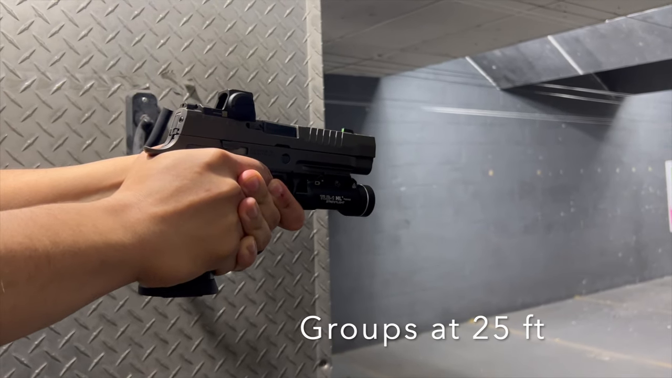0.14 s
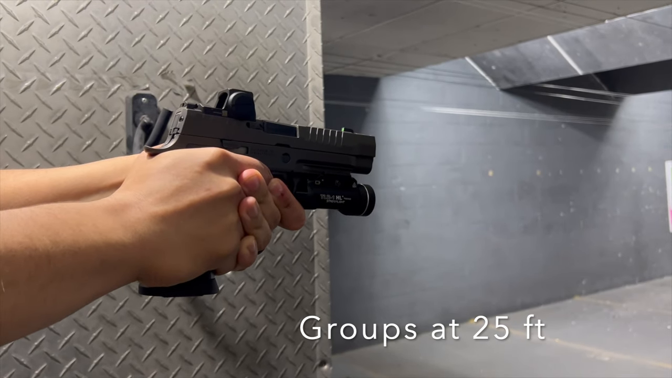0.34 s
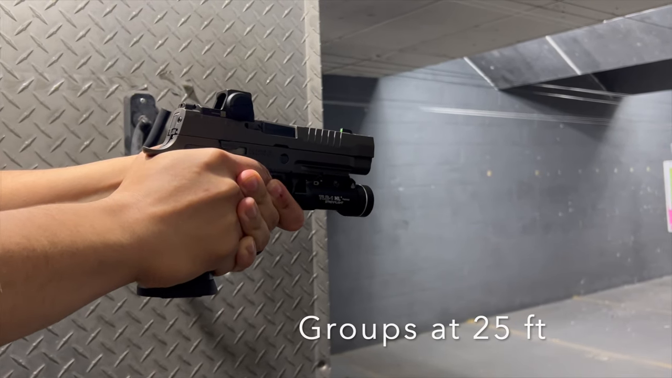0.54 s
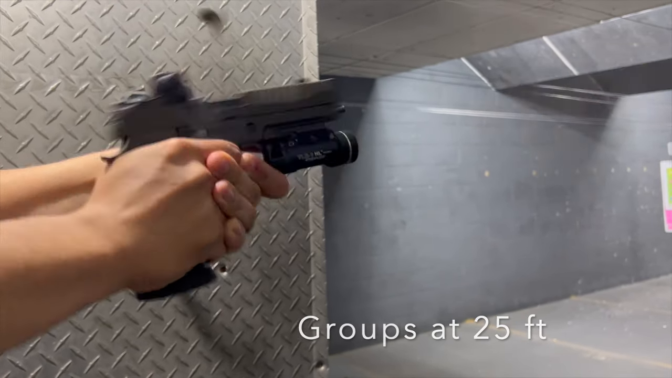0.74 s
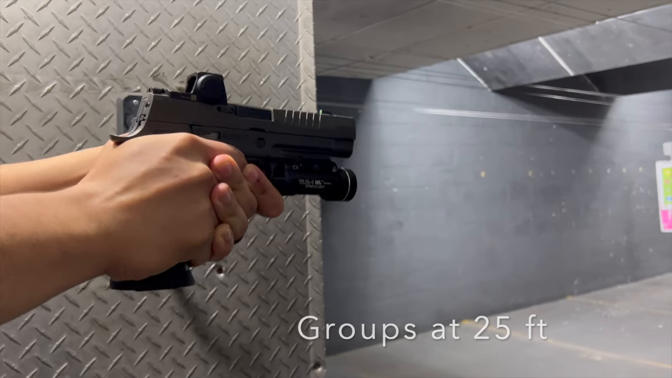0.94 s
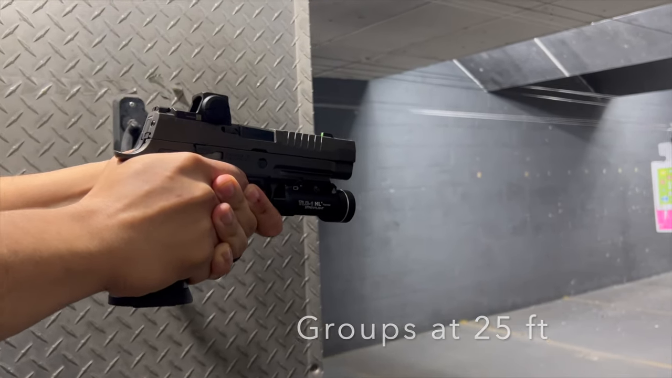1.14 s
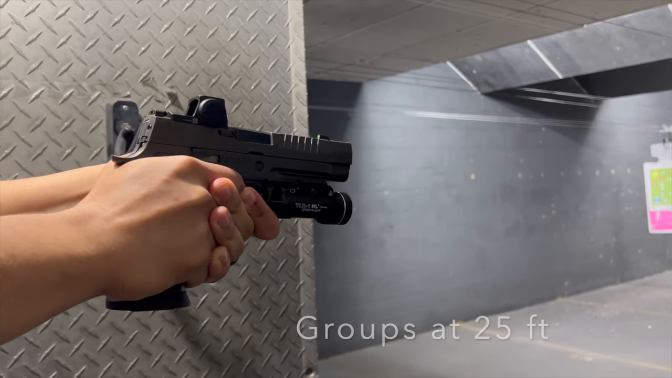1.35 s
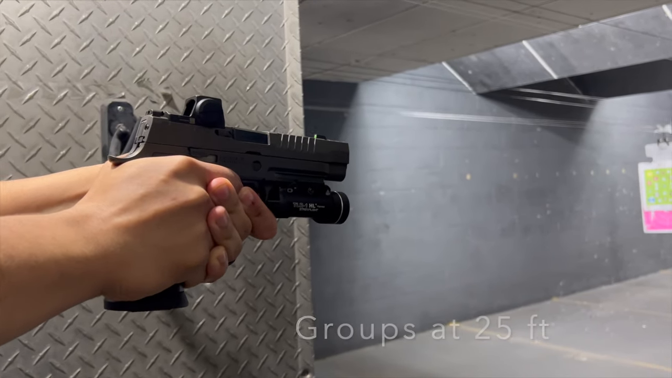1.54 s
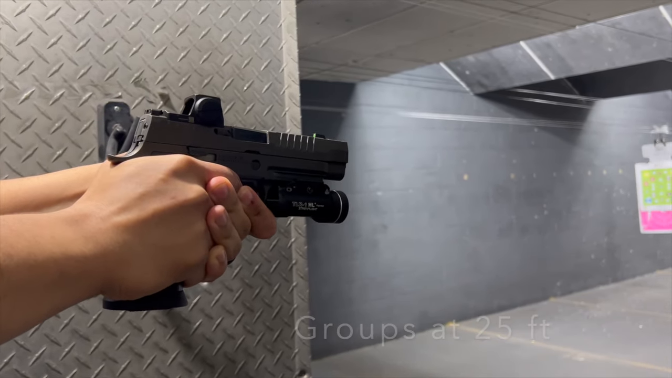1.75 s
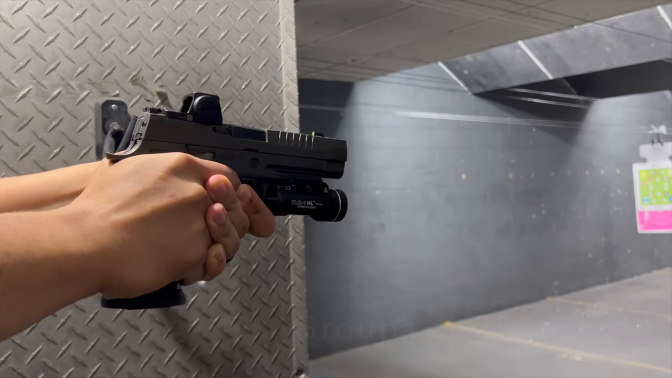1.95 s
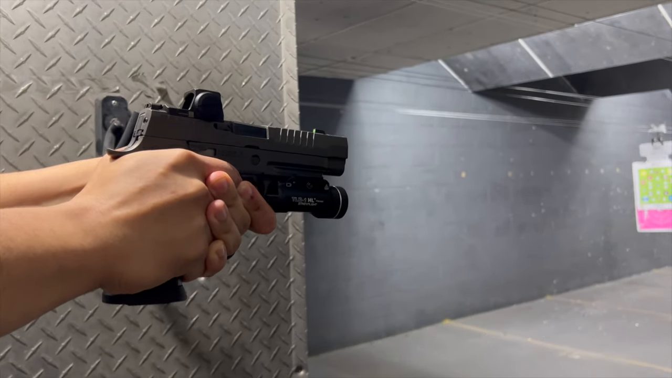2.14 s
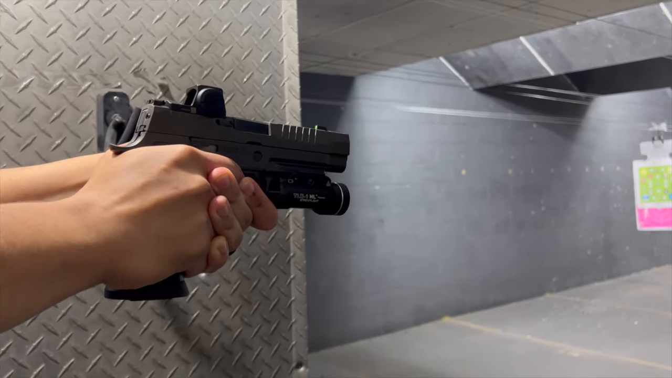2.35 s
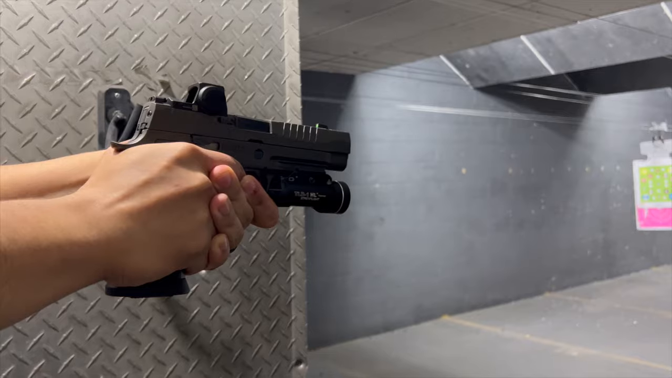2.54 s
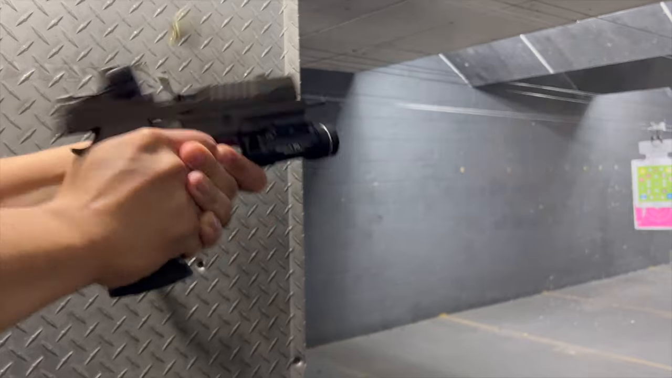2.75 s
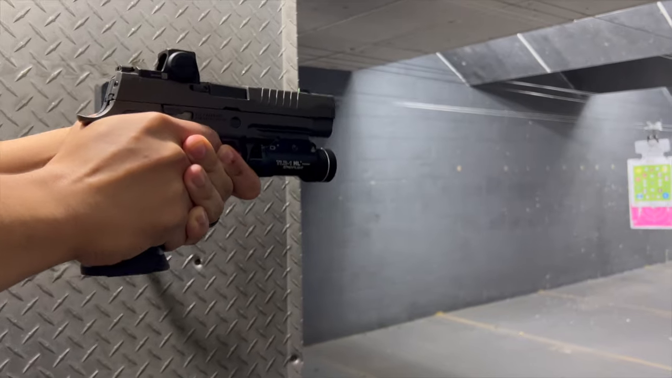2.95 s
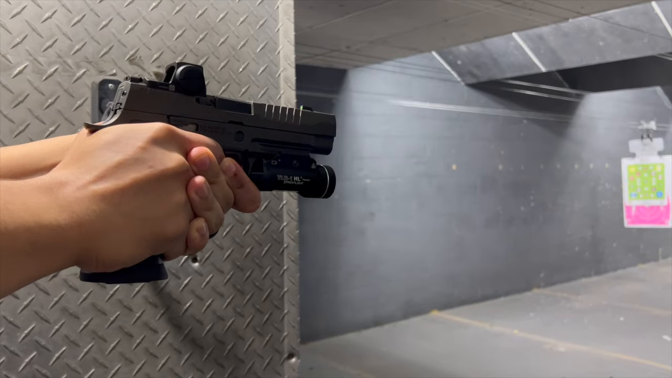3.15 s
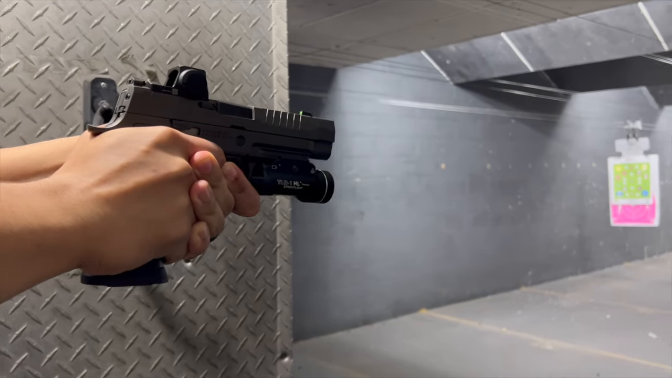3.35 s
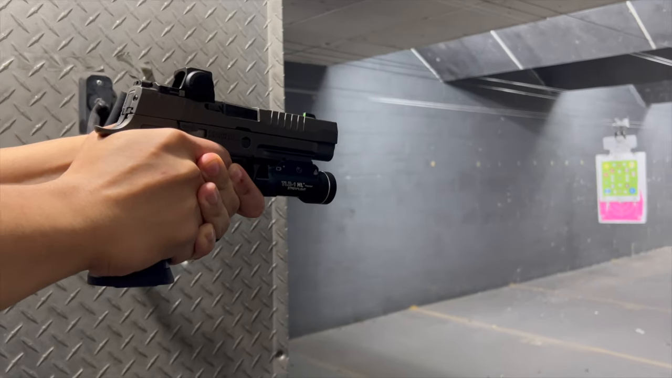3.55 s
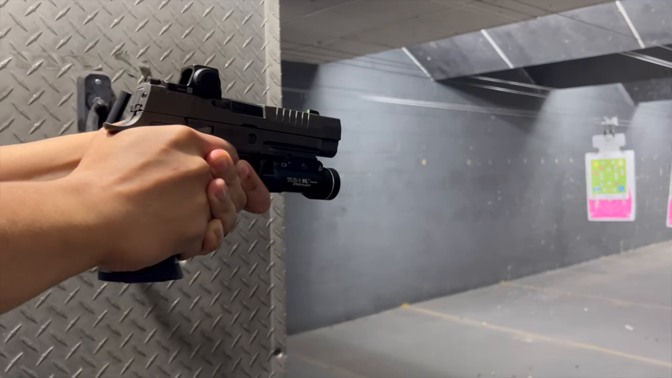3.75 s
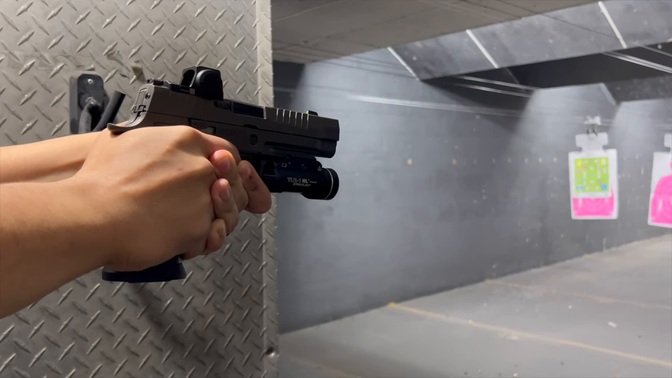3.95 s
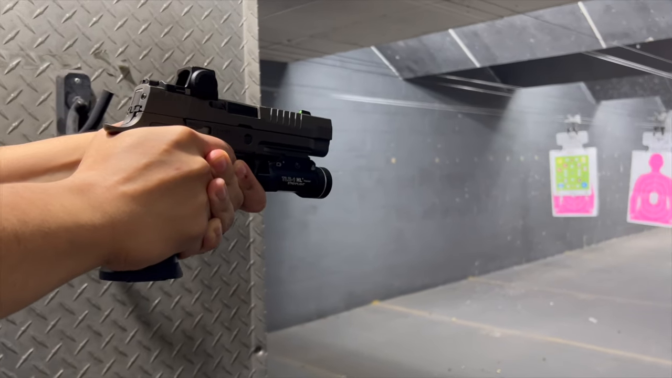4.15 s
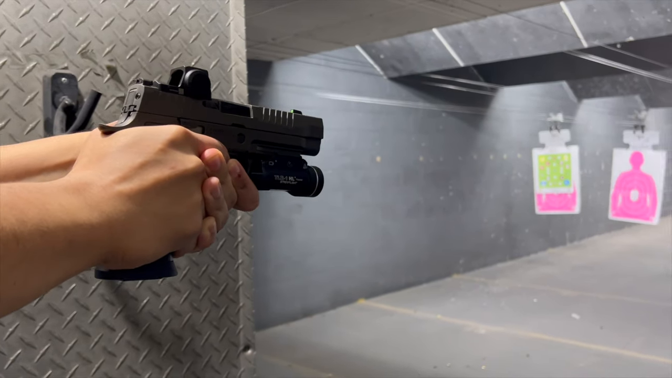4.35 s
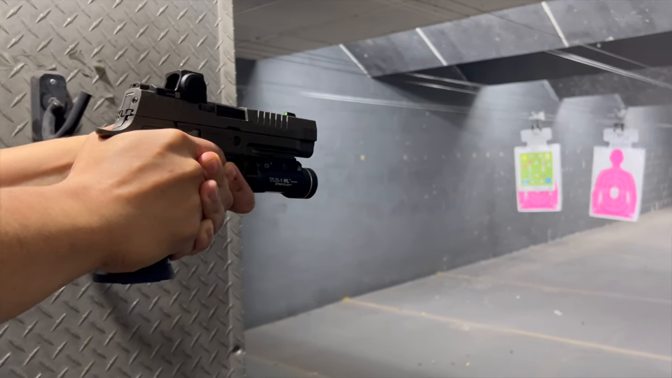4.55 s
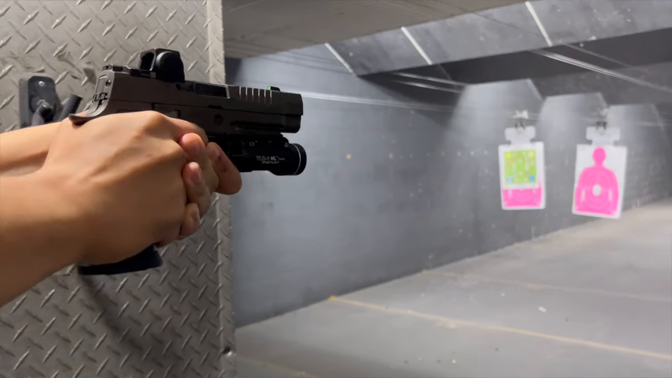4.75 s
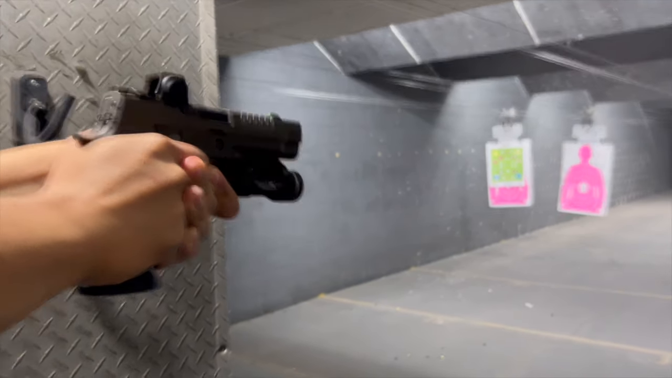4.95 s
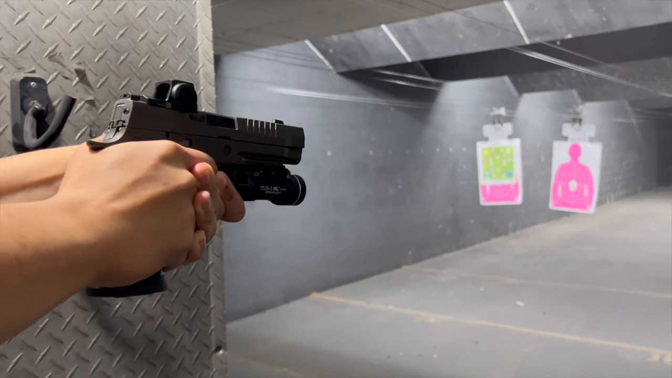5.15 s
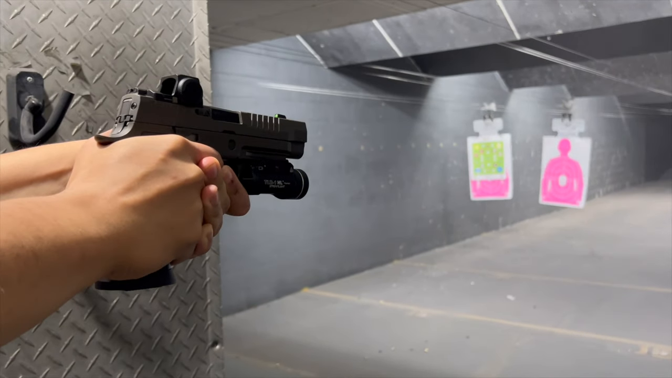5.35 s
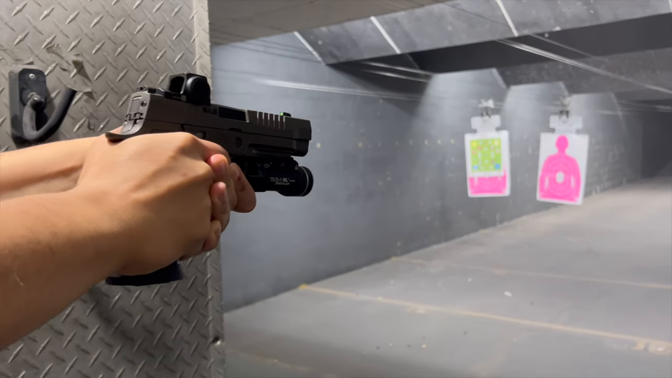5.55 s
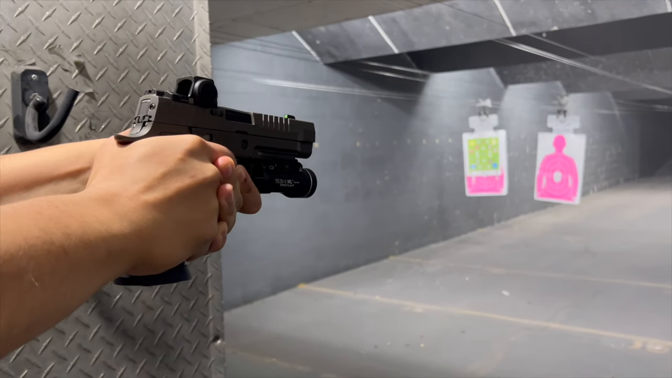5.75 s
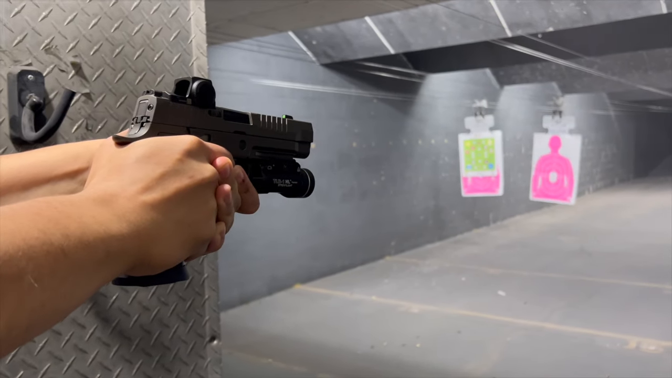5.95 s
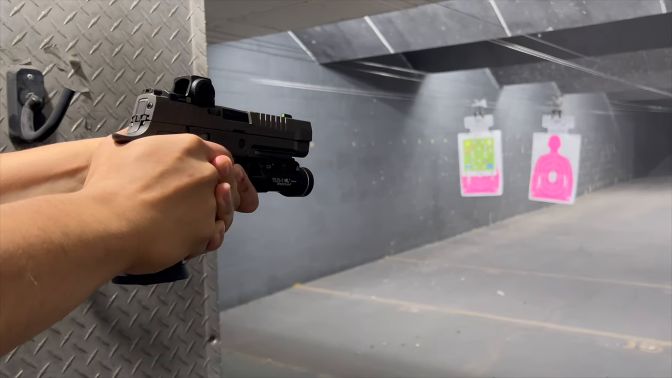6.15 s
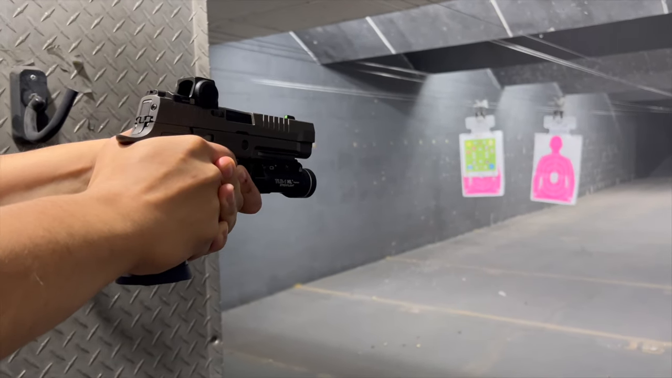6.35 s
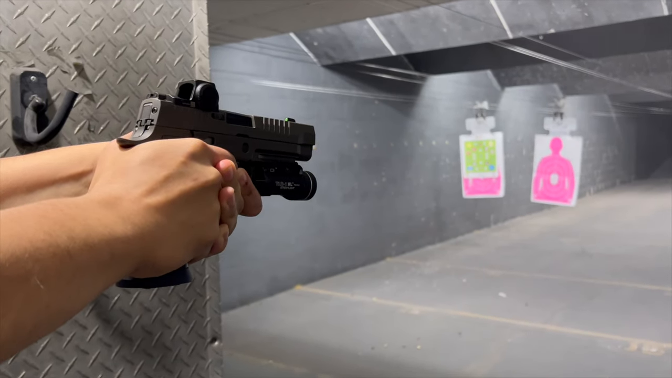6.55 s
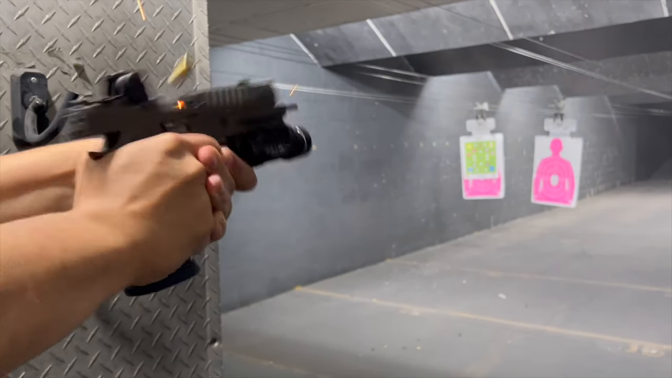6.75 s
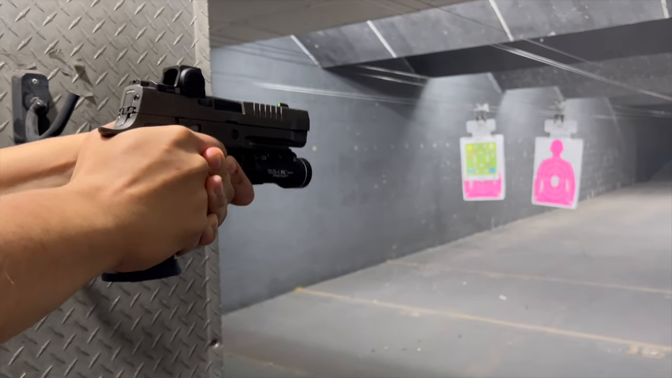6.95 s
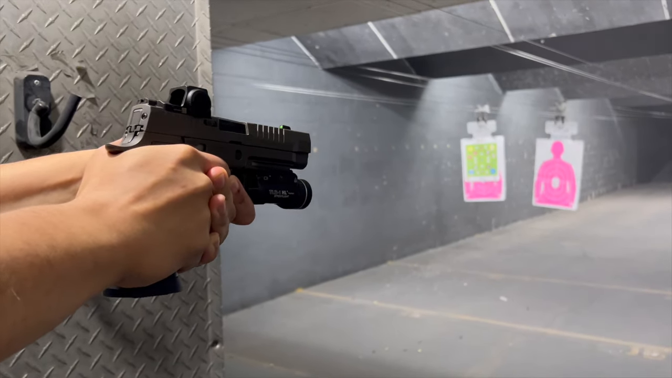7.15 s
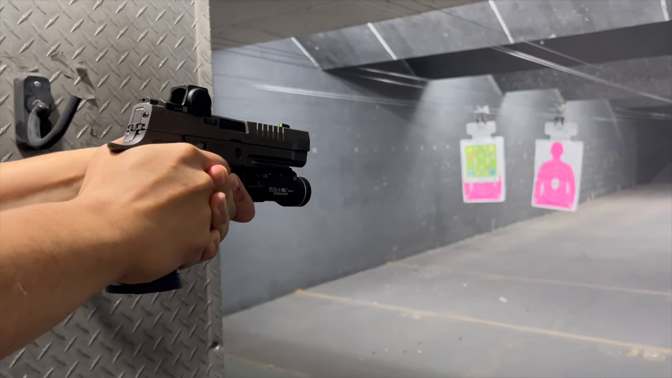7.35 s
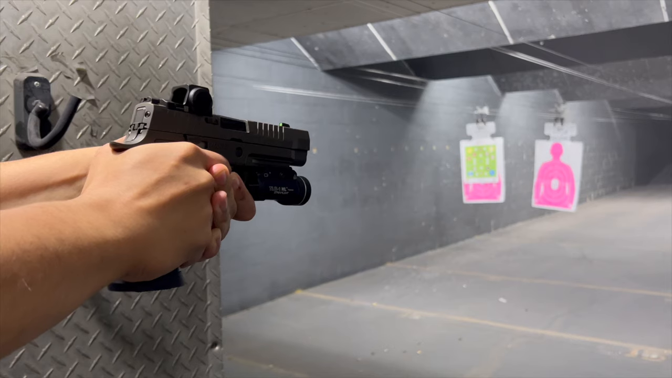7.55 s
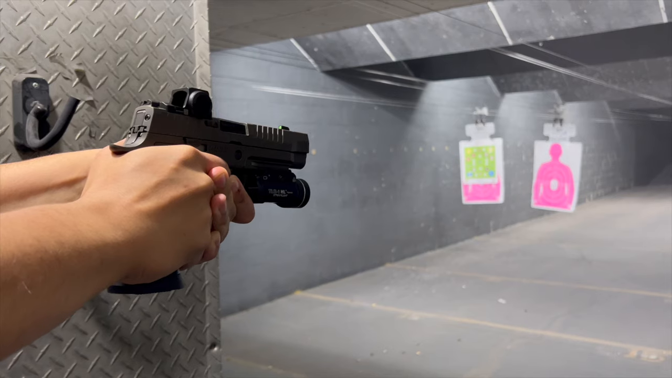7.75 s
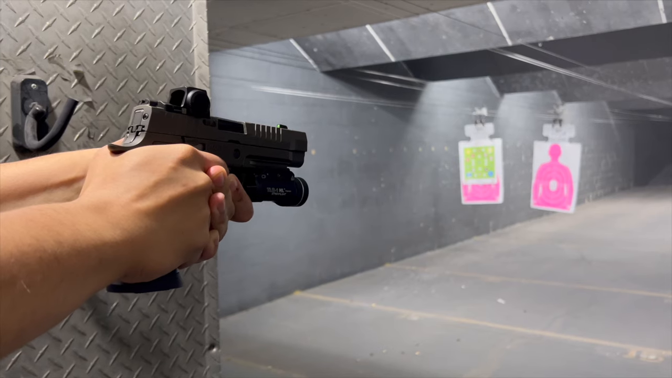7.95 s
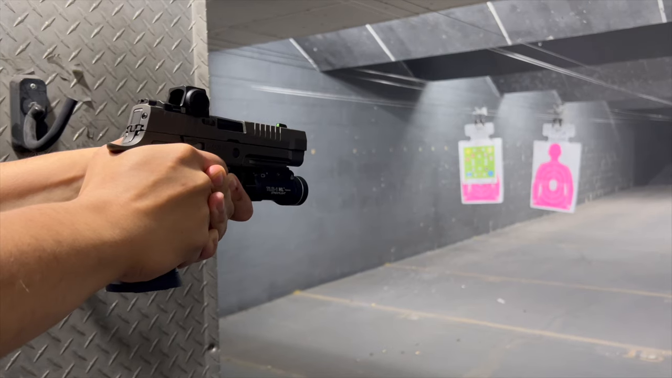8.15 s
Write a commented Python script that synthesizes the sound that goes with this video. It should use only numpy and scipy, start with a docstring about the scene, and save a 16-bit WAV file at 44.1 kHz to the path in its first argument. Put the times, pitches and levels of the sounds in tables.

```python
"""Ventilation noise runs throughout an indoor range; before each shot beside the camera a trigger clicks.
Two pistols fire in neighbouring lanes, the near one first, in a loose, uneven order: shaped noise makes
crack, booth roar and low boom. Echoes return from down the range, then the hall dies in two decays.
Brass cases clack on partitions, bounce and ring on the floor; one knocks the camera with a sagging sine.
The camera thins the deepest bass, limits the peaks and cuts the top."""
import sys
import numpy as np
from scipy import signal
from scipy.fft import rfft, irfft, next_fast_len
from scipy.io import wavfile
from scipy.ndimage import uniform_filter1d, minimum_filter1d

SR = 44100
rng = np.random.default_rng(int(sys.argv[2]) if len(sys.argv) > 2 else 0)


def transcribe(u):
    """Save the signal u as a 16-bit wav file named by the first command-line argument.

    u: samples, shape (n,) or (channels, n), limited to [-1, 1]; the rate is SR.
    q: integer samples, one column per channel.
    """
    v = np.clip(np.atleast_2d(u).T, -1, 1)
    q = np.round(v * 32767).astype(np.int16)
    wavfile.write(sys.argv[1], SR, q)


N = 365588
TIME = np.arange(2 * SR) / SR  # life of one shot [s]


def amp(db):
    """Decibels to gain."""
    return 10 ** (np.asarray(db) / 20)


def unit(x):
    """Scale x to rms 1."""
    return x / np.sqrt(np.mean(x ** 2) + 1e-20)


def along(points, hz):
    """Interpolate (frequency [Hz], value) points on a log frequency axis."""
    point_hz, values = np.transpose(points)
    return np.interp(np.log(hz + 1), np.log(point_hz + 1), values)


def add(track, start_s, sound):
    """Mix a sound into the track, cut at the track's end."""
    part = track[:, round(start_s * SR):][:, :sound.shape[-1]]
    part += sound[..., :part.shape[1]]


def swell(start_s, rise_s):
    """Exponential step from 0 to 1."""
    return 1 - np.exp(-np.maximum(TIME - start_s, 0) / rise_s)


def panned(pan_db):
    """Left and right gains for a level difference."""
    return amp([[pan_db / 2], [-pan_db / 2]])


# Likeness of the spaced microphones: (frequency [Hz], left-right correlation [-1..1])
ALIKE = [(100, .93), (230, .87), (380, .45), (570, .35), (850, .55), (1250, .38), (2000, .18), (4000, .08),
         (9800, .03), (11300, .8)]
# Stereo balance: (frequency [Hz], left minus right [dB])
BALANCE = [(60, 0), (380, -0.1), (600, 2.5), (850, 5), (2000, 8), (3500, 4), (6500, 5.5), (8500, -2),
           (13000, 0.5)]
# Stereo phase: (frequency [Hz], left lead [rad])
LEAD = [(100, .4), (380, .35), (570, 2), (850, 3.2), (1250, 4.1), (2000, 4.7), (4000, 6.3)]


def diffuse(white, spectrum, modes=()):
    """Sound field at two spaced microphones: white noise pairs coloured, correlated and set to rms 1."""
    size = white.shape[-1]
    hz = np.fft.rfftfreq(size, 1 / SR)
    db = along(spectrum, hz)
    for centre_hz, width_hz, lift_db in modes:
        db = db + lift_db / (1 + (2 * (hz - centre_hz) / width_hz) ** 2)
    coloured = rfft(white) * amp(db) * (hz > 18)
    # mixing angle that gives the wanted correlation
    angle = np.arccos(np.clip(along(ALIKE, hz), -1, 1)) / 2
    mid = coloured[..., 0, :] * np.cos(angle)
    side = coloured[..., 1, :] * np.sin(angle)
    tilt = amp(along(BALANCE, hz) / 2) * np.exp(.5j * along(LEAD, hz))
    pair = np.stack([(mid + side) * tilt, (mid - side) / tilt], axis=-2)
    return unit(irfft(pair, size))


# Ventilation spectrum: (frequency [Hz], relative density [dB])
VENT = [(25, -14.5), (50, -8.5), (95, -17), (125, -4.5), (165, -8), (230, -17.5), (500, -20.5),
        (900, -18.5), (1300, -19), (2000, -29), (3300, -37), (7000, -46.5), (15000, -54)]


def ventilation():
    """Steady airflow: faint coloured noise, strongest in the bass."""
    white = rng.standard_normal((2, next_fast_len(N)))
    return amp(-70) * diffuse(white, VENT)[:, :N]


def tick(spectrum, t60_s, room_db, modes=()):
    """Small hard contact: noise with a fast decay and a faint slower answer from the booth."""
    t = TIME[:SR // 2]
    noise = diffuse(rng.standard_normal((2, len(t))), spectrum, modes)
    contact = amp(-60 * t / t60_s)
    room = amp(room_db - 60 * t / 0.33)
    return noise * (contact + room)


# Trigger clicks: (time [s], level [dB])
TRIGGER = [(0.495, -57), (2.498, -55.5), (4.441, -57), (6.542, -54)]
# Click spectrum: (frequency [Hz], relative density [dB])
CLICK = [(300, -0.5), (1500, -9), (4000, -7), (7000, -0.5), (12000, -13), (15500, -12)]


def triggers():
    """Trigger taken up shortly before each near shot: a short noise click."""
    out = np.zeros((2, N))
    for s, db in TRIGGER:
        add(out, s, amp(db) * tick(CLICK, t60_s=0.03, room_db=-22))
    return out


# Contact of a brass case: (frequency [Hz], relative density [dB])
TICK = [(300, -20), (2000, -9.5), (5000, 2), (9000, -1.5), (12000, -12.5), (15500, -17)]
# Resonances of a struck case: (frequency [Hz], width [Hz], lift [dB])
BRASS = [(8670, 540, 1), (9540, 400, 2.5), (12900, 600, 3)]
# Cases landing on concrete: (time [s], level [dB], left minus right [dB], first flight [s])
LANDINGS = [(1.665, -61, 1, 0.079), (4.087, -59, 1, 0.026), (8.265, -72, 0, .08)]
BOUNCE_SHRINK, BOUNCE_LOSS_DB = 0.87, 3  # flight ratio; loss per bounce
CASE_RING_HZ, CASE_RING_DB, CASE_RING_T60_S = 10220, -12, 0.31  # ring level re the landing


def cases_on_floor(contacts=3):
    """Case bounces ever softer and sooner; after the first contact its mouth also rings as a sine."""
    out, t = np.zeros((2, N)), TIME[:SR // 2]
    ring_gain = amp(CASE_RING_DB - 60 * t / CASE_RING_T60_S)
    ring = ring_gain * np.sin(2 * np.pi * CASE_RING_HZ * t)
    for s, db, pan_db, flight_s in LANDINGS:
        for k in range(contacts):
            clink = tick(TICK, t60_s=0.061, room_db=-9.5, modes=BRASS)
            if k > 0:
                clink = clink + ring
            # sum of the k shrinking flights so far
            delay_s = flight_s * (1 - BOUNCE_SHRINK ** k) / (1 - BOUNCE_SHRINK)
            add(out, s + delay_s, amp(db - BOUNCE_LOSS_DB * k) * panned(pan_db) * clink)
    return out


# Cases striking the booth or the camera:
# (time [s], level [dB], left minus right [dB], second touch re first [dB])
CASE_STRIKES = [(1.001, -35, -10, -22), (1.061, -50, -2, -12), (1.273, -53.5, 6, 5), (3.052, -47, -4, -5),
                (4.958, -33.5, 0, -20), (5.194, -55, 0, 2), (7.204, -43, -4, -7)]
TUMBLE_S = 0.01  # from one end touching to the other


def case_strikes():
    """Ejected case strikes a partition, or once the camera, with a short bright clack; two touches."""
    out = np.zeros((2, N))
    for s, db, pan_db, second_db in CASE_STRIKES:
        for delay_s, touch_db in ((0, 0), (TUMBLE_S, second_db)):
            clack = tick(TICK, t60_s=0.044, room_db=-18, modes=BRASS)
            add(out, s + delay_s, amp(db + touch_db) * panned(pan_db) * clack)
    return out


# Rumble of the knocked camera: (frequency [Hz], relative density [dB])
RUMBLE = [(25, -8), (60, 2), (110, -10), (220, -8), (600, -45), (3000, -90)]


def camera_knock(s, db, high_hz, low_hz, sag_s, life_s, rumble_db, rumble_s):
    """Case knocks the camera: a decaying sine sags in pitch over a short noise rumble."""
    hz = low_hz + (high_hz - low_hz) * np.exp(-TIME / sag_s)
    thud = np.sin(2 * np.pi * np.cumsum(hz) / SR) * np.exp(-TIME / life_s)
    rumble = diffuse(rng.standard_normal((2, len(TIME))), RUMBLE) * np.exp(-(TIME / rumble_s) ** 2)
    out = np.zeros((2, N))
    add(out, s, (amp(db) * thud + amp(rumble_db) * rumble) * swell(0, 0.0028))
    return out


PATH_TURN_RAD = 1.05  # turn of the reflection pattern over the whole camera move


def paths(spots, same):
    """Dense reflections as noise: power share `same` is common to all shots and turns with the camera."""
    turn = PATH_TURN_RAD * spots[:, None, None]
    white = rng.standard_normal((len(spots) + 2, 2, len(TIME)))
    common = np.cos(turn) * white[0] + np.sin(turn) * white[1]
    return np.sqrt(same) * common + np.sqrt(1 - same) * white[2:]


# Slow decay strength: (frequency [Hz], level at MIDLIFE_S re fast decay [dB])
LINGER = [(50, -19.5), (200, -25), (400, -14.5), (1100, -9.5), (2600, -10), (3500, -14), (6000, -8.5),
          (12000, -16.5)]
# Fast decay of the hall: (frequency [Hz], t60 [s])
HALL_DECAY = [(50, 0.83), (100, 1.45), (300, 0.95), (700, 1.63), (1300, 1.29), (2500, 1.41), (5000, 0.94),
              (8000, 0.57), (14000, .45)]
MIDLIFE_S = .3  # time at which the fast decay passes 0 dB


def dying(x, late_stretch):
    """Each frequency dies at its own speed; the long lanes hold the mids in a slower second decay."""
    hz, t, z = signal.stft(x, SR, nperseg=256)
    fast_db = -60 * (t - MIDLIFE_S) / along(HALL_DECAY, hz)[:, None]
    slow_db = along(LINGER, hz)[:, None] + fast_db / late_stretch
    gain = np.hypot(amp(fast_db), amp(slow_db))
    return signal.istft(z * gain, SR, nperseg=256)[1][..., :x.shape[-1]]


# Lingering hall modes: (frequency [Hz], width [Hz], lift [dB])
HALL_MODES = [(92.4, 4.8, 11), (210.7, 60, 6.5), (387.6, 12, 7), (711, 33, 5.5), (920, 18, 1.5),
              (1113, 60, -4), (1315, 70, 1.5), (1790, 39, 3.5), (2580, 250, 1), (3400, 300, 0.5)]
RETURN_S, RETURN_RISE_S = .138, .008  # round trip to the far end; rise of the return
HALL_FILL_S = 0.029  # rise of the early hall sound


def hall_tails(spots, spectrum, early_db):
    """Reverberation builds at a reduced level, then fills once the blast returns from the far end."""
    returned = swell(RETURN_S, RETURN_RISE_S)
    filling = amp(early_db) * swell(0, HALL_FILL_S) * (1 - returned) + returned
    field = diffuse(paths(spots, same=0.72), spectrum, HALL_MODES)
    return dying(field, late_stretch=1.93) * filling


# Echo spectrum: (frequency [Hz], relative density [dB])
ECHO = [(40, -17.5), (120, 5.5), (300, -6), (700, 9), (1300, -0.5), (2200, 1), (3500, -18.5), (7000, -17),
        (14500, -49)]
ECHO_RISE_S = 0.0022


def range_echoes(spots, echoes):
    """Distinct returns from down the range: noise bursts with a quick rise and exponential fall."""
    surges = 0
    for delay_s, db, life_s in echoes:
        fall = np.exp(-np.maximum(TIME - delay_s, 0) / life_s)
        surges = surges + amp(db) * swell(delay_s, ECHO_RISE_S) * fall
    return diffuse(paths(spots, same=.65), ECHO) * surges


CLUMP_DB, CLUMP_FADE_S = 1.4, .25  # initial rms unevenness; time constant of evening out


def reflection_clumps():
    """Early reflections arrive in clumps, alike for every shot from one lane, and even out later."""
    uneven = unit(uniform_filter1d(rng.standard_normal(len(TIME)), size=300))
    return amp(CLUMP_DB * np.exp(-TIME / CLUMP_FADE_S) * uneven)


def ringing(x, centre_hz, lift_db, width_hz):
    """One broad booth resonance, lifted by a peak filter."""
    b, a = signal.iirpeak(centre_hz, centre_hz / width_hz, fs=SR)
    return x + (amp(lift_db) - 1) * signal.lfilter(b, a, x)


def partitions(x, walls_db, span_s, count=10):
    """Steel partitions add quick copies of the mids and treble, which comb the sound."""
    size = next_fast_len(N + SR // 4)
    hz = np.fft.rfftfreq(size, 1 / SR)
    taps = np.zeros((2, size))
    for channel in taps:
        delays = (rng.uniform(.2, 1, count) * span_s * SR).astype(int)
        channel[delays] = rng.choice([-1, 1], count) / np.sqrt(count)
    share = amp(walls_db) * hz ** 2 / (hz ** 2 + 1200 ** 2)
    comb = (1 + share * rfft(taps)) / np.hypot(1, share)
    return irfft(rfft(x, size) * comb, size)[:, :N]


# Low pressure wave in the booth: (frequency [Hz], relative density [dB])
BOOM = [(25, -21.5), (60, -2.5), (110, 1.5), (330, -1), (600, -7.5), (1500, -32), (6000, -70.5)]
# Camera moves round the shooter: (start [s], end [s])
CAMERA_MOVE_S = [3.13, 4.1]
# Booth ring: (before the move [Hz], after [Hz])
BOOTH_RING_HZ = [1320, 890]
FRONT_S = .0007  # rise of the blast front


def pistol(shots, crack, roar, hall, booth, echoes, crack_db, crack_s, roar_db, roar_rise_s, roar_s,
           hall_db, early_db, boom_db, boom_delay_s, boom_s):
    """Muzzle crack, roar between booth walls, swelling boom, echoes and hall, from shaped noise."""
    # camera position at each shot: 0 before the move, 1 after
    spots = np.interp([shot[0] for shot in shots], CAMERA_MOVE_S, [0, 1])
    front = swell(0, FRONT_S)
    crack_shape = front * np.exp(-(TIME / crack_s) ** 2)
    roar_shape = swell(0, roar_rise_s) * np.exp(-(TIME / roar_s) ** 4)
    boom_shape = front * np.exp(-((TIME - boom_delay_s) / boom_s) ** 2)
    cracks = diffuse(paths(spots, same=0.77), crack, booth) * crack_shape
    roars = diffuse(paths(spots, same=.8), roar, booth) * roar_shape
    booms = diffuse(paths(spots, same=.8), BOOM, booth) * boom_shape
    slaps = range_echoes(spots, echoes)
    halls = hall_tails(spots, hall, early_db)
    clumps = reflection_clumps()
    out = np.zeros((2, N))
    for k, (s, db, sharp_db, ring_db) in enumerate(shots):
        body = amp(roar_db) * roars[k] + amp(hall_db) * halls[k]
        direct = amp(crack_db + sharp_db) * cracks[k] + amp(boom_db) * booms[k]
        blast = direct + slaps[k] + clumps * body
        ring_hz = np.interp(spots[k], [0, 1], BOOTH_RING_HZ)
        add(out, s, amp(db) * ringing(blast, ring_hz, ring_db, width_hz=240))
    return partitions(out, walls_db=-10, span_s=.016)


# Shots in the neighbouring lane: (time [s], level [dB], crack offset [dB], booth ring lift [dB])
NEXT_SHOTS = [(1.946, -3, 2.5, 0), (3.403, -4, 5.5, 1), (4.737, -5, 5, 0.5), (6.046, -4, 5, 3),
              (7.251, -4.5, 4.5, 1.5)]
# Crack: (frequency [Hz], relative density [dB])
NEXT_CRACK = [(24, -32.5), (40, -18.5), (274, -0.5), (437, -1.5), (560, -10.5), (1290, -8), (1460, -8.5),
              (1780, -3), (2520, -26.5), (3220, -13), (3560, -22.5), (6270, -27.5), (13100, -35.5),
              (14500, -36.5)]
# Booth roar: (frequency [Hz], relative density [dB])
NEXT_ROAR = [(18, -42.5), (30, -17.5), (80, -14), (170, -6), (388, -5), (529, -4.5), (935, -2.5),
             (1090, -5), (1240, -9), (2630, -14.5), (2990, -19.5), (6670, -24), (14500, -40)]
# Hall at MIDLIFE_S: (frequency [Hz], relative density [dB])
NEXT_HALL = [(18, -46), (30, -10), (87, -3.5), (165, -8.5), (277, -6), (359, -5.5), (430, -7), (477, -4.5),
             (1340, -0.5), (1450, -8), (2250, -10.5), (5150, -22.5), (14500, -61)]
# Booth resonances and notches: (frequency [Hz], width [Hz], lift [dB])
NEXT_BOOTH = [(98.9, 10, 15.5), (127.2, 23, 11), (172.7, 41, -11), (249, 27, 6), (292, 22, 4), (424, 40, 8),
              (500, 35, -2), (767, 52, 4.5), (886, 42, -2), (1300, 45, 9)]
# Echoes from down the range: (delay [s], level [dB], life [s])
NEXT_ECHOES = [(0.131, -12.5, 0.075), (0.164, -20, 0.004)]


def next_pistol():
    """Pistol one lane over: shorter crack, quicker roar and an early, brief boom."""
    return pistol(NEXT_SHOTS, NEXT_CRACK, NEXT_ROAR, NEXT_HALL, NEXT_BOOTH, NEXT_ECHOES,
                  crack_db=-12.5, crack_s=0.027, roar_db=-8, roar_rise_s=0.0079, roar_s=0.099,
                  hall_db=-23.5, early_db=-1.5, boom_db=-11.5, boom_delay_s=0.0086, boom_s=0.005)


# Shots beside the camera: (time [s], level [dB], crack offset [dB], booth ring lift [dB])
NEAR_SHOTS = [(0.709, -1, 1, 4.5), (2.719, -1.5, 0, 3), (4.601, -1.5, -1.5, 3), (6.730, -2.5, 0.5, 5)]
# Crack: (frequency [Hz], relative density [dB])
NEAR_CRACK = [(24, -39.5), (40, -2), (377, -16.5), (682, -17.5), (916, -2), (1140, -8), (1360, -4),
              (1500, -13.5), (1780, 2), (2020, -9), (2170, -9), (3640, -11.5), (6430, -14.5), (14500, -31)]
# Booth roar: (frequency [Hz], relative density [dB])
NEAR_ROAR = [(18, -33.5), (30, -11.5), (118, 1.5), (174, -3), (237, 0.5), (602, -6.5), (686, 0.5),
             (1150, -5.5), (1610, -15), (2370, -10), (2920, -17.5), (6500, -23), (14500, -44)]
# Hall at MIDLIFE_S: (frequency [Hz], relative density [dB])
NEAR_HALL = [(18, -62), (30, -25.5), (91, -2.5), (161, -10.5), (285, -5), (332, -10.5), (634, -0.5),
             (780, -6), (1010, -0.5), (1650, -9), (2310, -9.5), (5150, -23), (14500, -58)]
# Booth resonances and notches: (frequency [Hz], width [Hz], lift [dB])
NEAR_BOOTH = [(127, 14, 4.5), (192, 20, -7.5), (231.5, 18, 7.5), (306.4, 16, 6), (372.4, 22, 9.5),
              (490, 52, 1), (547, 45, 11.5), (876, 50, -1), (1390, 290, 5.5), (1547, 90, -1.5),
              (1764, 90, -2)]
# Echoes from down the range: (delay [s], level [dB], life [s])
NEAR_ECHOES = [(0.141, -14, 0.04), (0.205, -12.5, 0.004), (0.352, -29, 0.007)]


def near_pistol():
    """Pistol beside the camera: longer crack, slower roar and a later, longer boom."""
    return pistol(NEAR_SHOTS, NEAR_CRACK, NEAR_ROAR, NEAR_HALL, NEAR_BOOTH, NEAR_ECHOES,
                  crack_db=-12, crack_s=0.06, roar_db=-11.5, roar_rise_s=0.017, roar_s=0.12,
                  hall_db=-24.5, early_db=-3, boom_db=-18, boom_delay_s=0.066, boom_s=0.043)


def scene():
    """Ventilation, small metal sounds, the camera knock and both lanes."""
    knock = camera_knock(s=4.961, db=-12, high_hz=235, low_hz=56, sag_s=0.0061, life_s=0.022,
                         rumble_db=-35, rumble_s=.22)
    metal = triggers() + cases_on_floor() + case_strikes()
    return ventilation() + metal + knock + next_pistol() + near_pistol()


def limited(x, top_db, hold_s):
    """Gain ducks just ahead of each peak and holds briefly."""
    size = max(int(hold_s * SR), 2)
    need = np.minimum(1, amp(top_db) / (np.abs(x).max(axis=0) + 1e-9))
    return x * uniform_filter1d(minimum_filter1d(need, size), size)


TOP_HZ = 15000  # band limit


def record(dry):
    """Camera thins the deepest bass, limits the blasts and cuts steeply above its band limit."""
    size = next_fast_len(N + SR // 2)
    hz = np.fft.rfftfreq(size, 1 / SR)
    low_pass = 1 / np.sqrt(1 + (hz / TOP_HZ) ** 100)
    thin = signal.sosfilt(signal.butter(2, 33, 'high', fs=SR, output='sos'), dry)
    held = limited(thin, top_db=-.7, hold_s=.003)
    return irfft(rfft(held, size) * low_pass, size)[:, :N]


dry = scene()
out = record(dry)
transcribe(out)
```